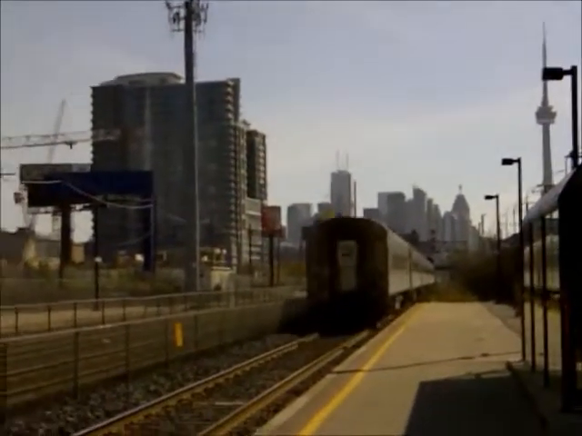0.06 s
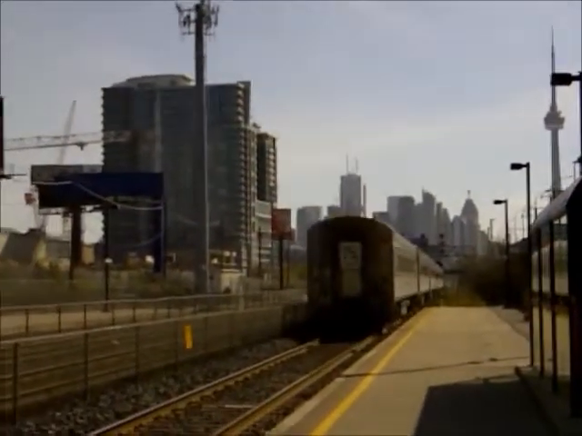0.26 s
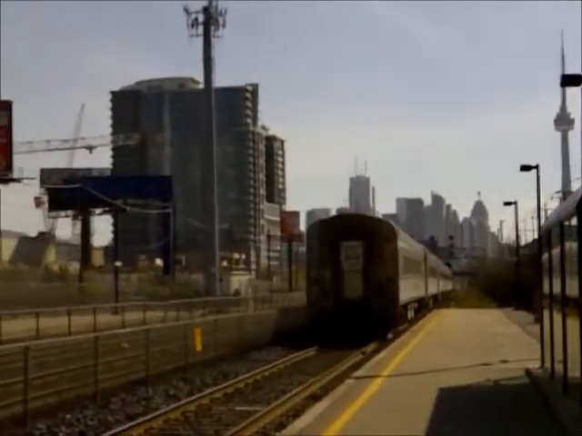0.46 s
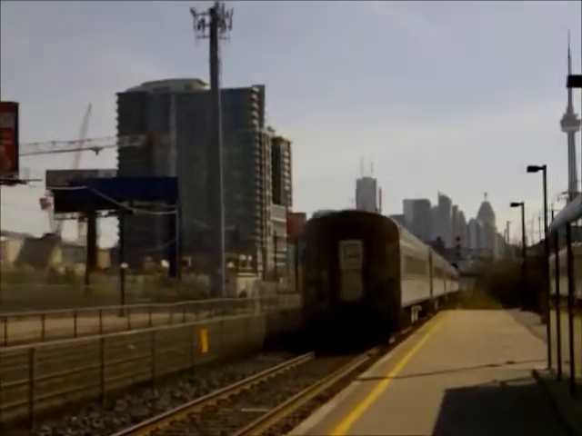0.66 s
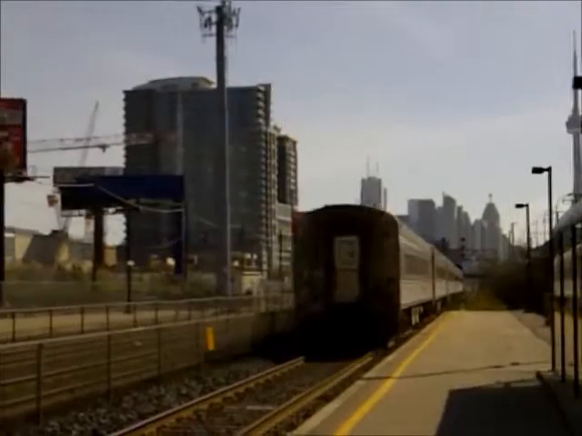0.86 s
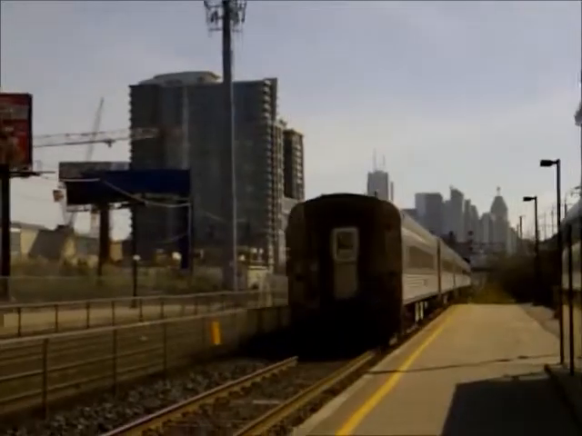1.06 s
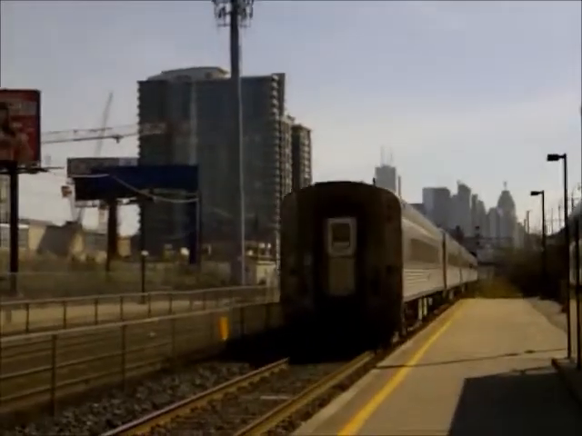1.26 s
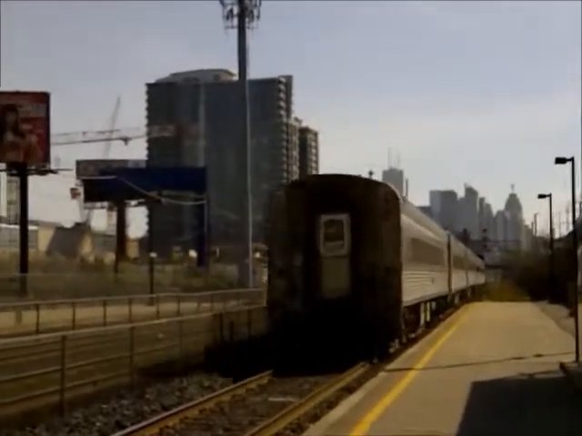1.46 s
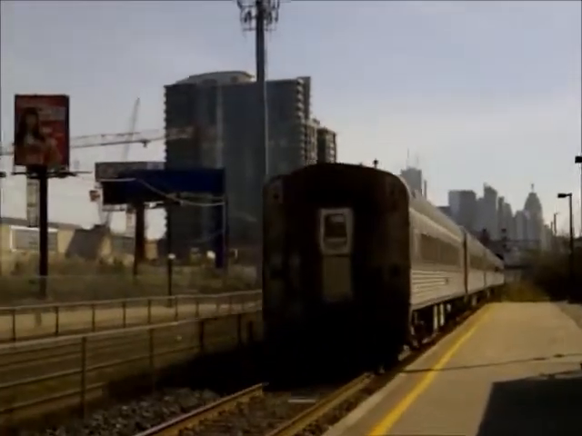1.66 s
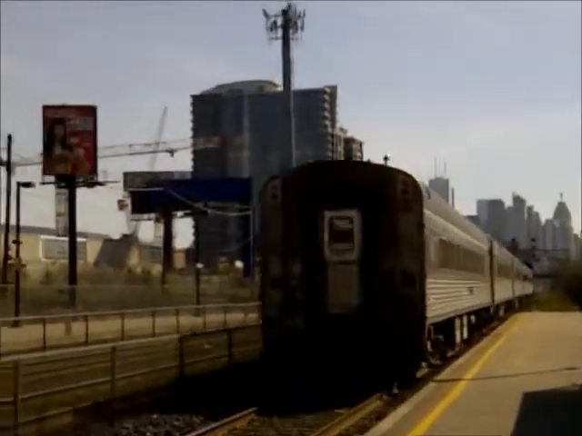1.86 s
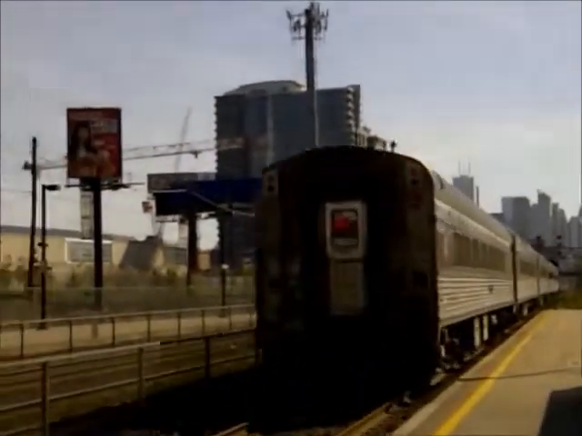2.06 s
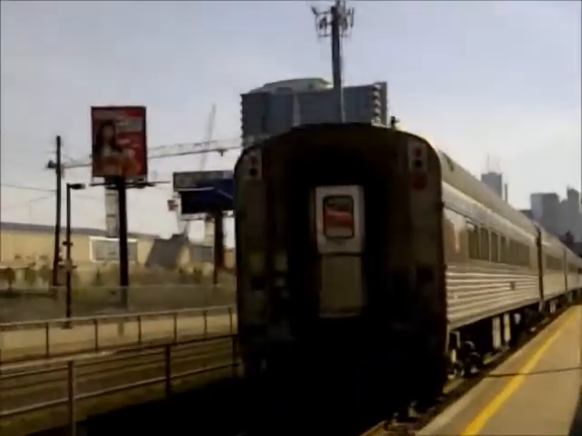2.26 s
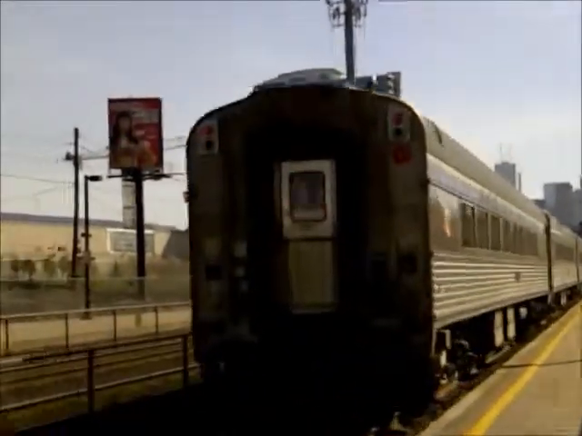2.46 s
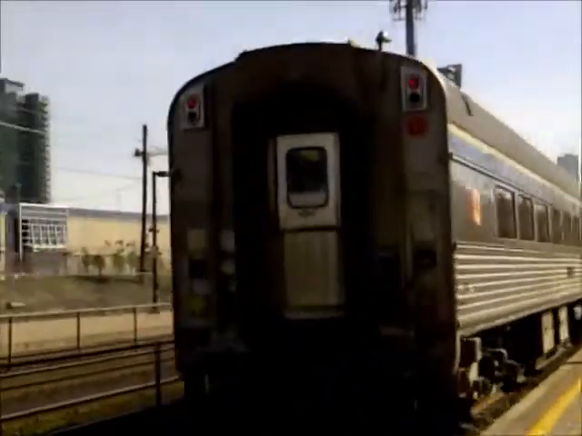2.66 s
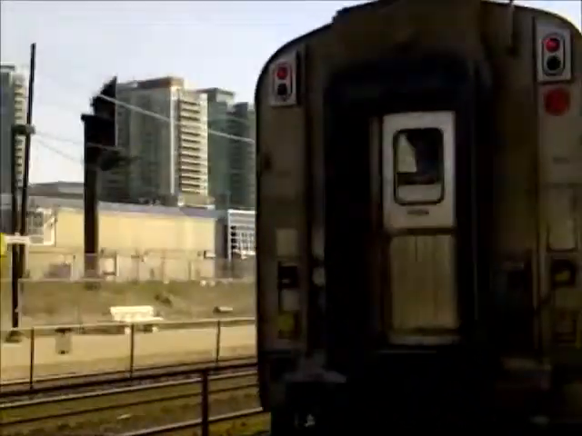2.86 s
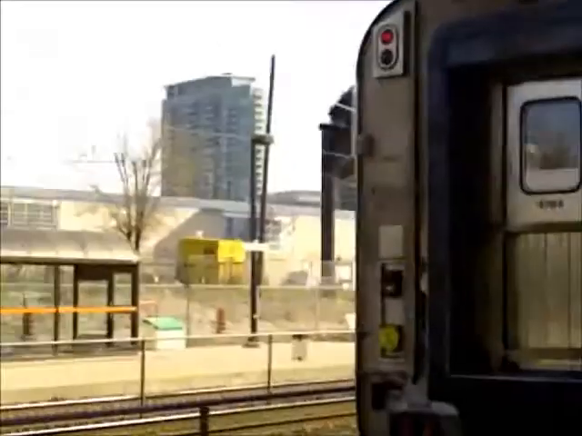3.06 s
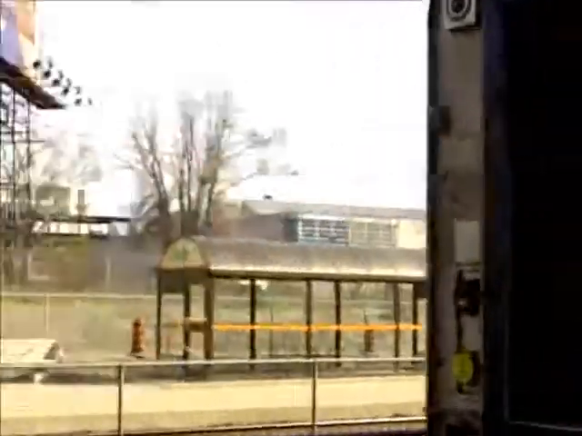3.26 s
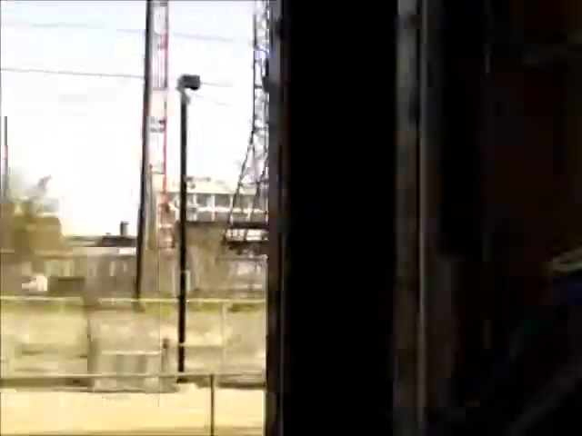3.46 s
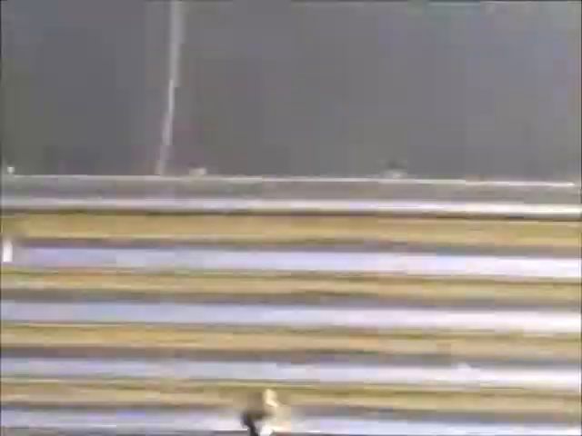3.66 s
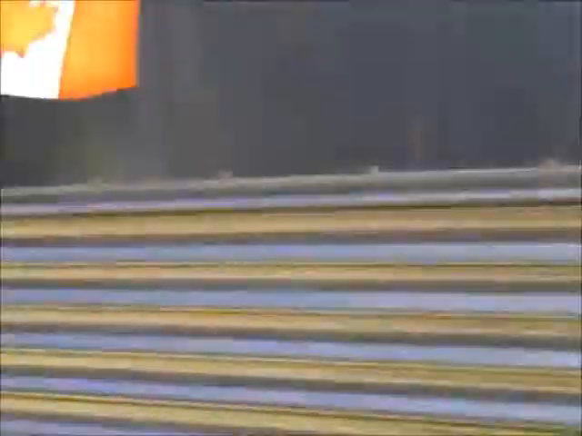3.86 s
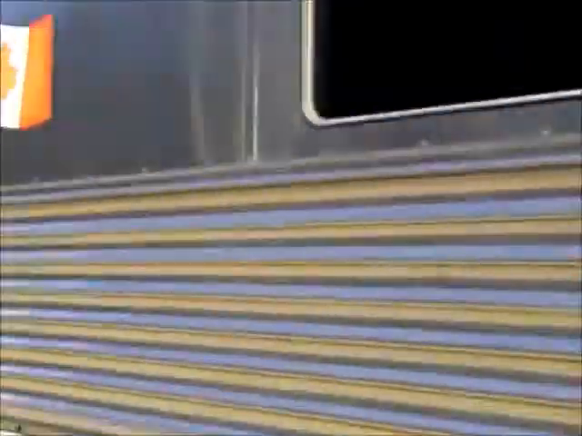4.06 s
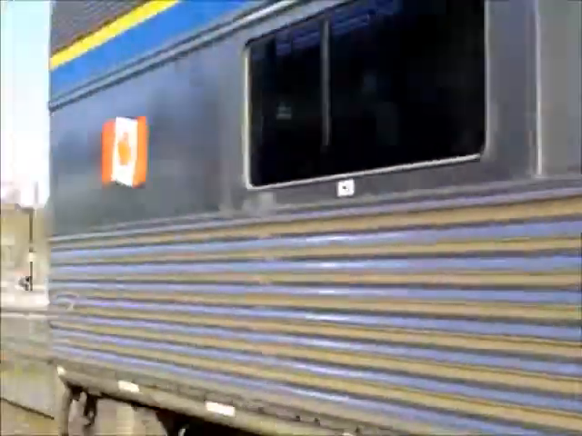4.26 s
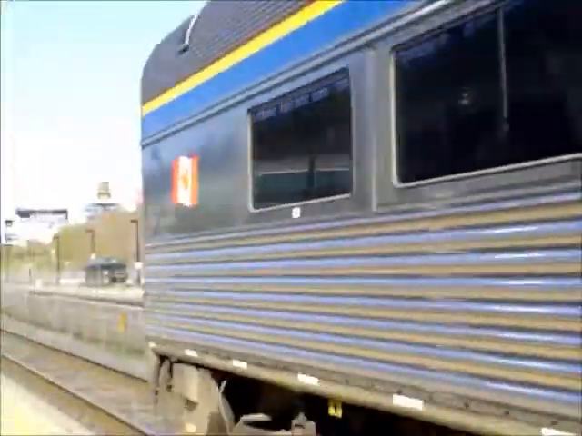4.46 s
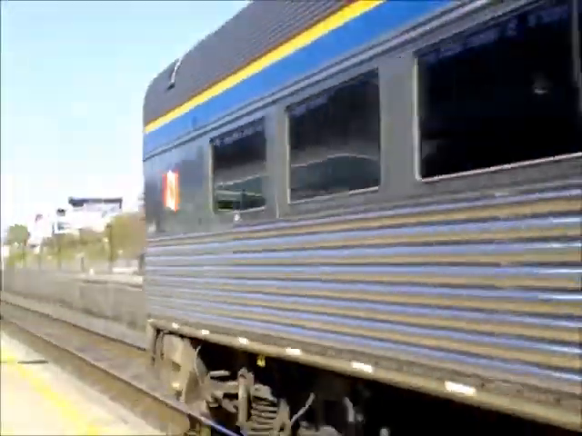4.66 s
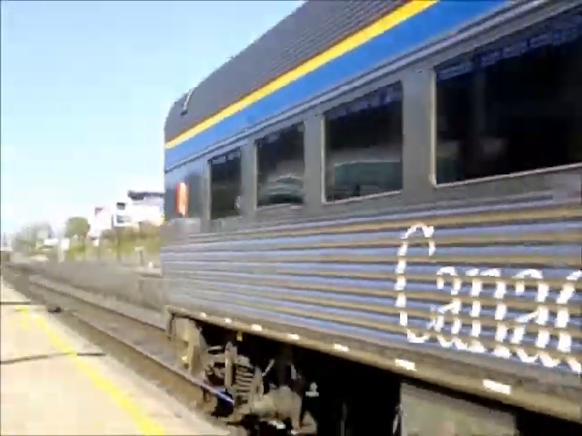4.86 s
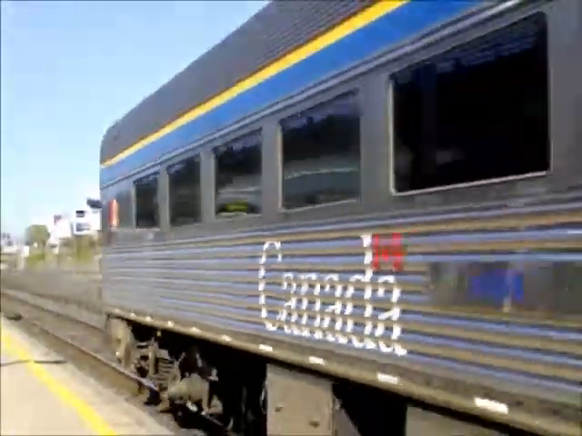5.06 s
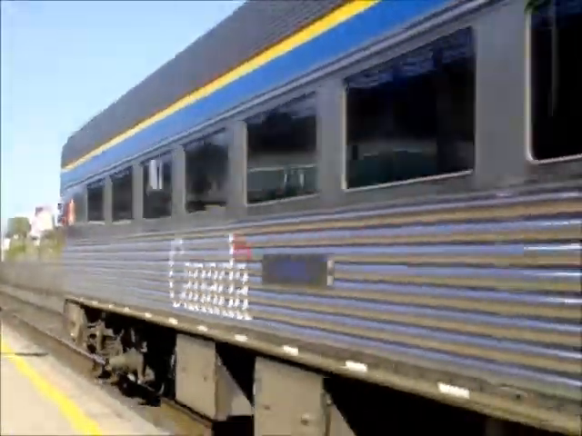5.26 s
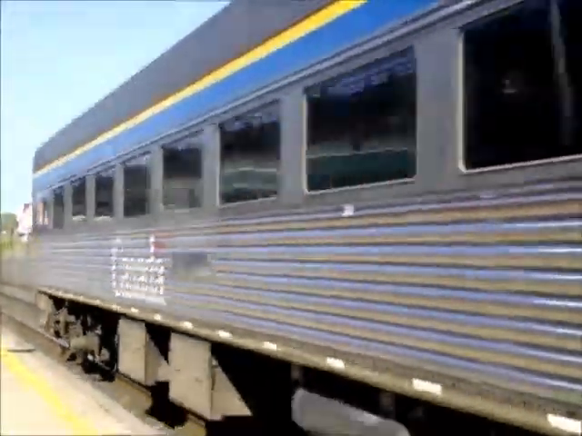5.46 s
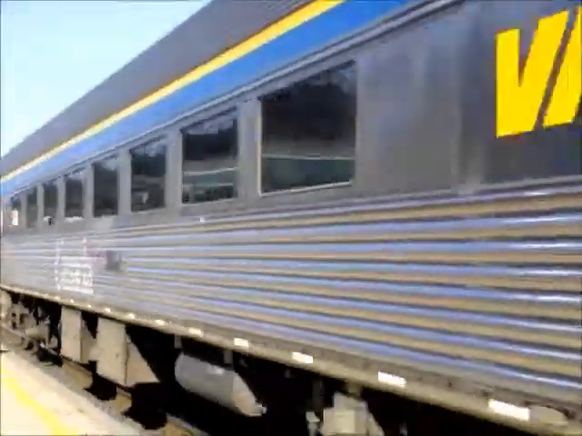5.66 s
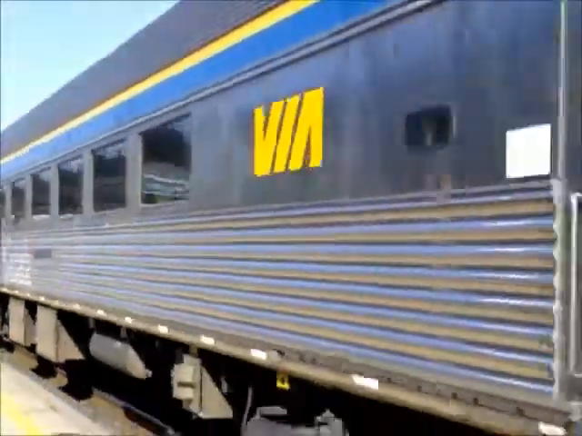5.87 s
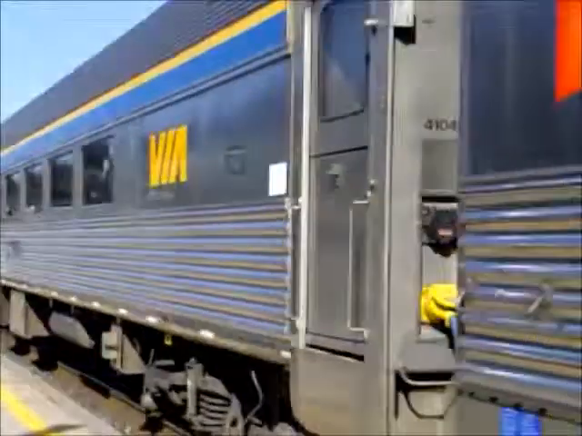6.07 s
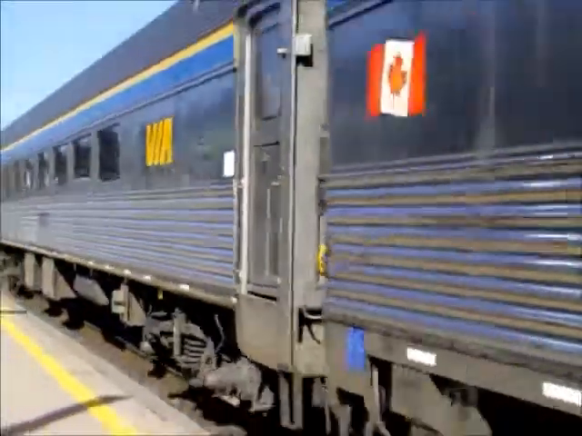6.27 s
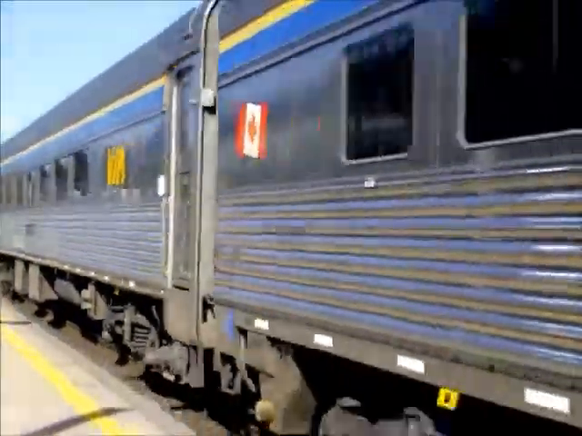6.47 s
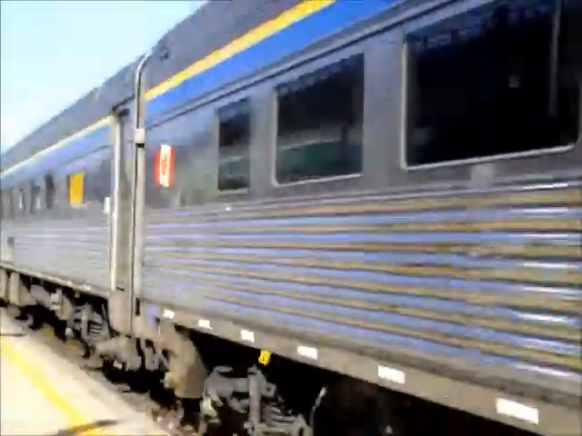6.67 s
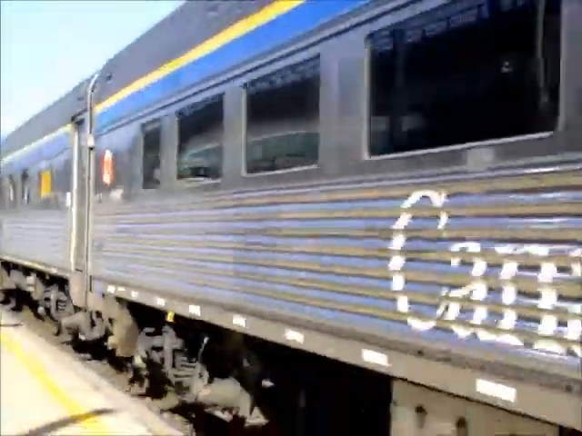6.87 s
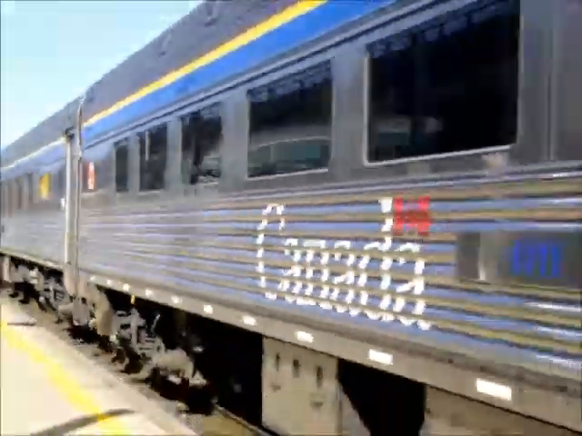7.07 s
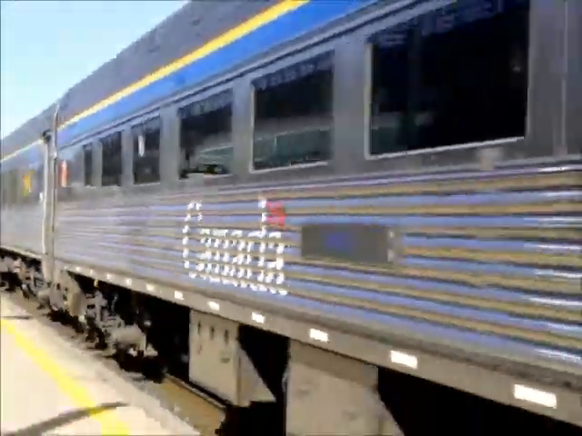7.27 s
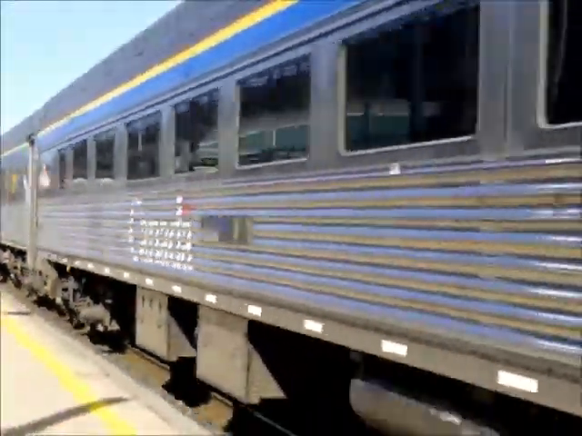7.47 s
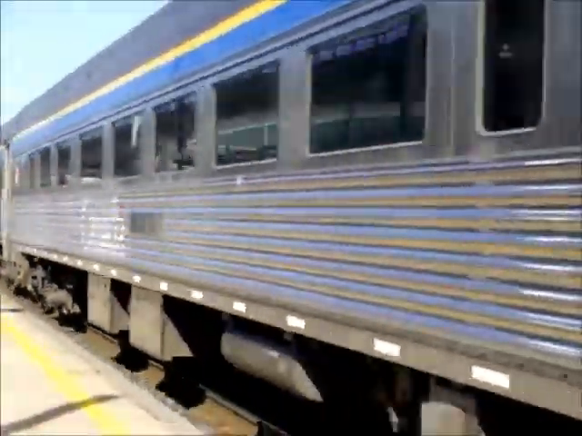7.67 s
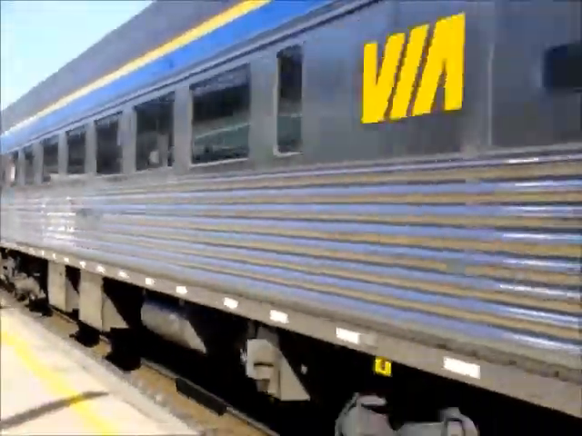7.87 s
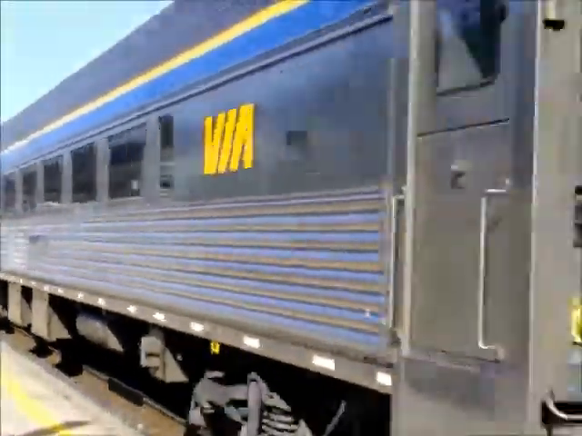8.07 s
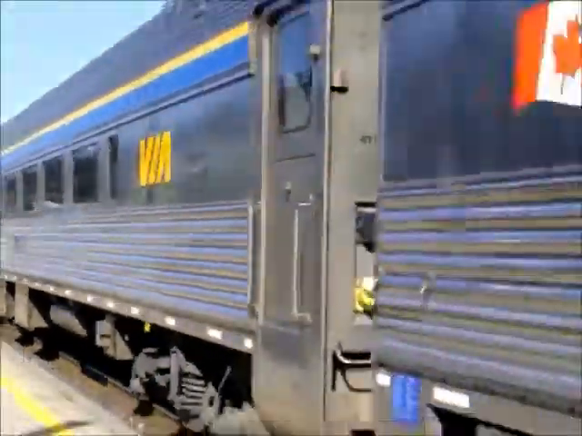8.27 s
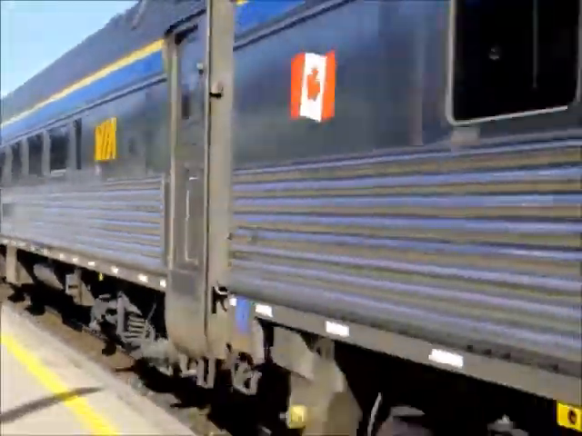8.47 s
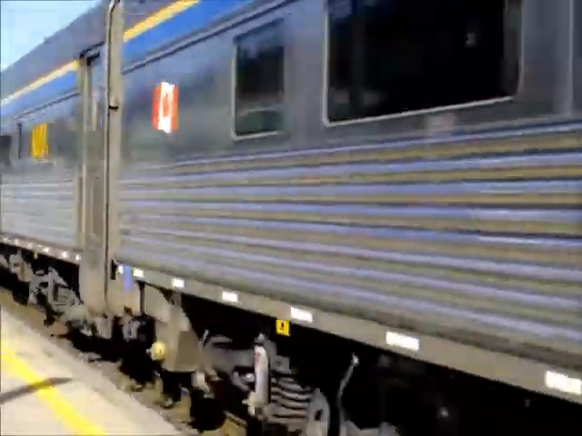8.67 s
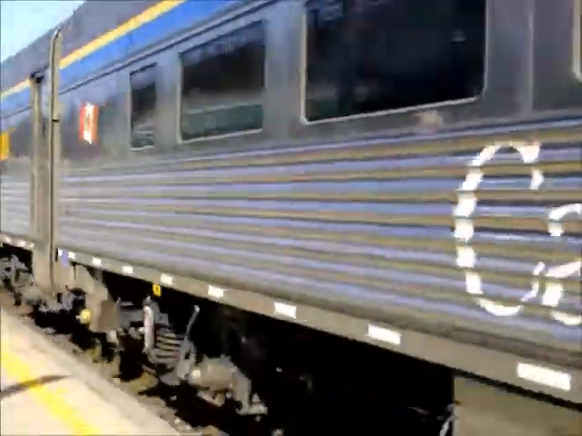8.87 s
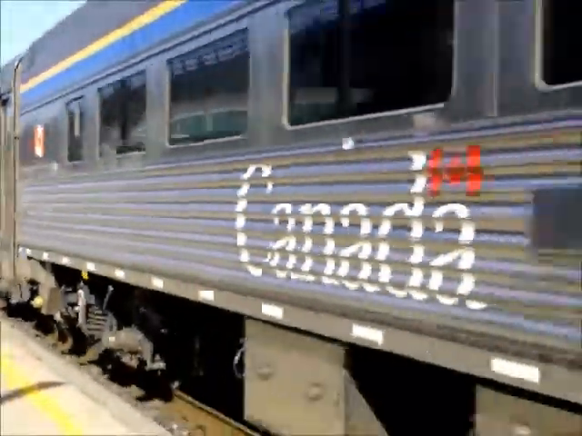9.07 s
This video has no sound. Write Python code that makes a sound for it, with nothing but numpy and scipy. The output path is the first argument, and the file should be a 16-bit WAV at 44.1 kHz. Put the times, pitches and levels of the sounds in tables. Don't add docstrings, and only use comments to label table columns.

```python
import sys
import numpy as np
from scipy import signal
from scipy.io import wavfile
from scipy.ndimage import uniform_filter1d, minimum_filter1d

SR = 44100
rng = np.random.default_rng(int(sys.argv[2]) if len(sys.argv) > 2 else 0)


def store_pcm(level_fs):
    pcm = np.round(np.clip(level_fs, -1, 1) * 32767).astype(np.int16)
    wavfile.write(sys.argv[1], SR, np.atleast_2d(pcm).T)


def elevation(decibels):
    levels = np.asarray(decibels, float)
    return 10 ** (levels / 20)


N = 402633
STEP = 64


def unit(x):
    return x / np.sqrt(np.mean(x ** 2))


def band(x, lo_hz, hi_hz):
    sos = signal.butter(2, [lo_hz, min(hi_hz, SR / 2.2)], "bandpass", fs=SR, output="sos")
    return signal.sosfilt(sos, x)


def walk(rate):
    hold, count = int(SR / STEP / rate), N // STEP + 1
    levels = np.repeat(rng.standard_normal(count // hold + 1), hold)
    return unit(uniform_filter1d(uniform_filter1d(levels, hold), hold)[:count])


def fine(control):
    return np.interp(np.arange(N) / STEP, np.arange(len(control)), control)


def add(out, s, x):
    i = int(s * SR)
    out[i:i + len(x)] += x[:len(out) - i]


def swell(t, rise_s):
    return np.sin(np.pi / 2 * np.minimum(t / rise_s, 1)) ** 2


def stay(t, start, end, edge_s):
    return np.clip(np.minimum(t - start, end - t) / edge_s + 0.5, 0, 1)


def layers(t):
    # t/s, level/dB (0 = a coach abreast)
    nearness = [(0, -16), (0.8, -15), (1.3, -9.5), (1.75, -10.5), (2.45, -10), (2.76, -3.5), (3.15, -3.5),
                (3.4, -1), (3.85, 1.5), (4.2, 0.7), (5.0, -0.5), (6.0, -0.1), (6.55, 1.2), (7.2, -0.76),
                (8.2, 0.4), (9.13, -1.1)]
    # start t/s, length t/s, level/dB
    grinds = [(1.06, 0.19, 4.5), (1.3, 0.39, 5.5), (2.68, 0.3, 4), (3.496, 0.66, 2), (4.298, .15, 1.5),
              (4.845, 1.15, 3), (6.379, .1, 3.5), (6.678, 0.096, 1.5), (6.9, .1, 2.5), (7.1, .2, 2.5),
              (7.52, 0.28, 2), (8.998, .4, 4.5)]
    town_sinks = [1.2, 1.3]
    near_db = np.interp(t, *np.transpose(nearness))
    grind_db = sum(db * stay(t, s, s + length, 0.11) for s, length, db in grinds)
    town = elevation(-31 + np.interp(t, town_sinks, [0, -5]))
    engine_nears_db = 0.7 * (t - 4.0)
    ground = elevation(-33 + 1.7 * np.minimum(near_db, 0) + engine_nears_db)
    drum_db = -13 + near_db
    rumble_db = 20 * np.log10(np.hypot(town, ground))
    roar_db = -24 + 0.53 * near_db + 0.41 * grind_db
    hiss_db = -41.5 + 0.49 * near_db + grind_db
    return drum_db, rumble_db, roar_db, hiss_db


def rolling(t):
    # f/Hz, level/dB per Hz
    far_colour = [(15, -42), (25, -7), (97, -16.5), (193, -5), (228, -6), (276, -0.5), (351, -6),
                  (456, -0.5), (513, -13), (733, -16), (952, -14.5), (1500, -21), (1900, -35),
                  (5280, -57.5), (7370, -65), (9580, -93), (16200, -120)]
    near_colour = [(15, -53), (25, -18.5), (86, -14), (120, -15.5), (240, 1), (456, -2), (806, -14.5),
                   (1650, -19), (2040, -35.5), (2350, -33.5), (4500, -44.5), (5400, -55.5), (6300, -60),
                   (7370, -58), (9580, -95), (16200, -120)]
    arrives = [2.5, 4.23]
    # t/s, level/dB
    boom = [(0, 1), (0.7, 3), (1.5, 1), (2.2, 0), (2.7, -4), (3.2, 3), (3.7, -1), (4.2, -2), (4.8, 0),
            (5.5, 0), (6.1, 0), (6.6, 1), (7.1, -3), (7.6, 0), (8.2, 3), (8.8, -4), (9.13, -3)]
    boom_range = [110, 150, 210, 260]
    drum, rumble, roar, hiss = layers(t)
    near = np.interp(t, arrives, [0, 1])
    boom_db = np.interp(t, *np.transpose(boom))
    far_hz, far_level = np.transpose(far_colour)
    near_hz, near_level = np.transpose(near_colour)
    shake, out = walk(15), 0
    for lo, hi, db, shared_db, own_db in ((33.6, 146.0, rumble, 0.18, 0.53), (149.8, 600, drum, 0.82, 1.16),
                                          (600, 1900, roar, 1.1, 0.9), (1900, 7600, hiss, 1.3, 1.1)):
        edges = np.geomspace(lo, hi, int(4 * np.log2(hi / lo)) + 1)
        gains = []
        for a, b in zip(edges, edges[1:]):
            middle = np.log(a * b) / 2
            far_db = np.interp(middle, np.log(far_hz), far_level)
            near_db = np.interp(middle, np.log(near_hz), near_level)
            gains.append(elevation(far_db + near * (near_db - far_db)) * np.sqrt(b - a))
        gains = np.array(gains)
        gains *= elevation(db) / np.sqrt(np.sum(gains ** 2, axis=0))
        for a, b, gain in zip(edges, edges[1:], gains):
            octaves = np.interp(np.log2(a / 330), [-1, 0, 0.44, 1.7], [-0.4, 0, 1, 0.26])
            dull_db = -0.5 * np.maximum(t - 5.2, 0) * octaves
            floor_db = boom_db * np.interp(a, boom_range, [0, 1, 1, 0])
            shake_db = shared_db * shake + own_db * walk(13) + 0.6 * walk(3)
            flicker = elevation(shake_db + dull_db + floor_db)
            out = out + fine(gain * flicker) * unit(band(rng.standard_normal(N), a, b))
    return out


def singing(t):
    # start t/s, end t/s, f/Hz, width f/Hz, level/dB
    resonances = [(0.41, 13, 93, 12, -40), (0.62, 0.9, 280, 6, -34), (1.5, 1.95, 279, 9, -32),
                  (0.21, 2, 460, 26, -39.5), (3.49, 4.79, 1690, 90, -32), (7.6, 7.8, 1830, 70, -41.5),
                  (4.8, 6.6, 1850, 63, -46.5), (8.0, 9.3, 1650, 46, -40.5), (6.9, 11, 1200, 91, -37),
                  (3.3, 4.7, 2400, 200, -43), (4.6, 7.9, 2400, 70, -43), (7.9, 9.2, 2250, 120, -46),
                  (3.5, 4.9, 3950, 180, -54), (4.2, 5.7, 4000, 160, -50), (5.6, 9.3, 3900, 140, -52),
                  (3.4, 8.4, 3100, 120, -54.5), (2.75, 3.55, 387, 60, -21), (4.3, 9.3, 4880, 200, -61),
                  (4.6, 7.9, 2270, 120, -47)]
    hum_turn = 2 * np.pi * 92.9 * np.cumsum(1 + 0.012 * fine(walk(4))) / SR
    out = fine(elevation(-43 + 3.0 * walk(3))) * np.sqrt(2) * np.sin(hum_turn)
    white = rng.standard_normal((2, N))
    for k, (start, end, hz, width, db) in enumerate(resonances):
        on = slice(max(int((start - 0.5) * SR), 0), int((end + 0.5) * SR))
        noise = np.roll(white, k * SR // 2, axis=1)[:, on]
        rough = signal.lfilter([1], [1, -np.exp(-np.pi * width / SR)], noise)
        turn = 2 * np.pi * hz * np.cumsum(1 + 0.011 * fine(walk(3))[on]) / SR
        ring = unit(rough[0] * np.cos(turn) + rough[1] * np.sin(turn))
        patchy = elevation(db + 2.8 * walk(11) + 1.4 * walk(2.5))
        level = fine(stay(t, start, end, 0.2) * patchy)[on]
        out[on] += level * band(ring, hz / 1.29, hz * 1.295)
    return out


def ticks():
    # t/s, peak level/dB
    clicks = [
        (0.1256, -43),
        (0.2853, -41),
        (0.4479, -36),
        (0.4658, -41),
        (0.6823, -48),
        (0.8031, -49),
        (0.9941, -36),
        (1.8794, -44),
        (2.0243, -43.5),
        (2.5004, -39),
    ]
    out, t = np.zeros(N), np.arange(SR // 5) / SR
    for s, db in clicks:
        rough = 1 + 0.4 * rng.standard_normal(len(t))
        click = rough * np.cos(2 * np.pi * 5600 * t) * np.exp(-t / 0.0004)
        add(out, s, elevation(db + 6.0) * band(click, 3000, 7200))
    return out


def clanks():
    # t/s, peak level/dB, hiss above 2 kHz level/dB, main ring f/Hz, length factor
    blows = [(0.569, -10, -56, 318, 0.64), (0.612, -10.5, -59, 418, 0.76), (1.037, 1, -34, 1055, 0.87),
             (1.079, -3, -34.5, 426, 1.2), (1.117, -4, -35.5, 350, 0.82), (1.247, 1, -29, 857, 1.25),
             (1.283, -11, -33, 950, .8), (1.318, -2.5, -29, 327, .9), (1.378, -15, -33, 410, 0.74),
             (1.455, -14, -33.5, 1400, 1.25), (1.522, -7.5, -31, 350, 0.43), (1.579, -11, -35.5, 320, 1.37),
             (2.493, -7.5, -41.5, 376, 1.1), (2.612, -2, -37, 330, 0.99), (2.702, -7.5, -35, 378, 1.13),
             (3.069, -5, -42, 304, 1.07), (3.124, -7, -48, 328, 1.2), (3.223, -9.5, -42, 323, 1.16)]
    # f/Hz, level/dB, fall by 60 dB t/s
    switch_rings = [(286, -6, 0.11), (369, -4, 0.099), (482, -3, 0.12), (664, -4, 0.042), (764, 2.5, 0.046),
                    (924, -4.5, .04), (1120, -8, 0.034), (1350, -9, 0.02), (1750, -13, 0.017),
                    (2050, -15, 0.025), (2600, -18, .02), (3100, -22, .02)]
    rise_s, fall_s = 0.0098, 0.0145
    out, t = np.zeros(N), np.arange(SR // 3) / SR
    rails = sum(elevation(g) * np.sin(2 * np.pi * hz * t) * 1000. ** (-t / t60) for hz, g, t60 in switch_rings)
    for s, db, hiss_db, hz, length in blows:
        shape = swell(t, rise_s * length) * np.exp(-t / fall_s / length)
        blow = rng.standard_normal(len(t)) * shape
        crunch = unit(band(signal.fftconvolve(blow, rails)[:len(t)], 220, 3400))
        ring = unit(band(blow, hz - min(0.22 * hz, 140.), hz + min(0.21 * hz, 140.)))
        body = min(hz / 750, 1.) * crunch + elevation(-0.5) * ring
        grit = rng.standard_normal(len(t))
        hiss = unit(signal.lfilter([1], [1, -0.8], band(grit, 2000, 5200)))
        sizzle = unit(band(grit, 0.83 * 6340, 1.12 * 6340))
        splash = (hiss + elevation(-14) * sizzle) * uniform_filter1d(shape ** 0.5, size=500)
        clank = elevation(db - 5.0) * body / np.abs(body).max() + elevation(hiss_db - 2.5) * splash
        add(out, s - 0.55 * rise_s * length, clank)
    t = np.arange(SR // 2) / SR
    yard = rng.standard_normal(len(t)) * np.minimum(t / 0.011, 1) * 1000. ** (-t / 0.75)
    echo = signal.fftconvolve(out, yard / np.sqrt(np.sum(yard ** 2)))[:N]
    return out + elevation(-6.5) * echo


def ring_parts(parts):
    out, t = np.zeros(N), np.arange(SR // 5) / SR
    rise_s, unsteady = 0.006, 0.45
    for s, hz, db, t60 in parts:
        flutter = unit(uniform_filter1d(rng.standard_normal((2, len(t))), size=180))
        tone = (1 + unsteady * flutter[0]) * np.sin(2 * np.pi * hz * t + unsteady * flutter[1])
        tone = band(band(tone, hz / 1.6, hz * 1.6), hz / 1.6, hz * 1.6)
        add(out, s - rise_s / 2, elevation(db) * swell(t, rise_s) * 1000. ** (-t / t60) * tone)
    return out


def pings():
    # t/s, f/Hz, peak level/dB, fall by 60 dB t/s
    struck = [(1.040, 1117, -7, .07), (1.060, 2050, -22, .06), (1.076, 2050, -24, 0.055),
              (1.115, 2000, -23, 0.065), (1.117, 3300, -34, .06), (1.248, 765, -9, .12),
              (1.254, 2105, -20, .13), (1.279, 946, -16, .12), (1.288, 2890, -31, .09),
              (1.316, 2900, -25.5, .07), (1.316, 1250, -19.5, 0.065), (1.372, 1254, -21, .08),
              (1.455, 2110, -22.5, 0.17), (1.456, 937, -18, .1), (6.279, 3140, -30.5, .06),
              (6.396, 2155, -21, 0.064), (6.940, 3200, -28, .12), (7.571, 3620, -32, 0.057),
              (7.853, 1450, -19, .07), (7.855, 2170, -24, .06), (7.860, 2920, -27, 0.089),
              (8.305, 1296, -17.5, .09), (8.530, 1087, -15.5, .12), (8.533, 2980, -33, .07),
              (0.569, 324, -16, .03), (0.612, 380, -11, .05), (0.630, 270, -15, .12),
              (1.042, 293, -14, 0.073), (1.055, 482, -12.5, .12), (1.084, 440, -12, .09),
              (1.112, 291, -13, .08), (1.130, 300, -14, .1), (1.152, 470, -14, .1), (1.240, 474, -14, .15),
              (1.252, 1000, -13, .06), (1.252, 1510, -18, .06), (1.270, 400, -13, .1),
              (1.326, 310, -9.5, .1), (2.695, 4510, -43, .12), (2.695, 6520, -55, .12),
              (2.86, 2450, -30, 0.11), (7.65, 2350, -32, .19), (7.104, 600, -11, .05),
              (8.074, 600, -11, .05), (6.938, 2600, -29, .07), (7.568, 3100, -31, .06),
              (8.528, 1800, -24, .07),
              (1.240, 6200, -40, .2),
        (1.255, 6700, -43, .15),
        (1.450, 6300, -41, .2),
        (1.044, 1700, -20, .08),
        (1.048, 2250, -25, .06),
        (1.250, 1750, -20, .08),
        (1.316, 5500, -42, .06),
        (6.945, 3600, -33, .1),
        (7.78, 3300, -35, .07),
        (2.74, 3100, -36, .2),
    ]
    return ring_parts(struck)


def knocks():
    # t/s, peak level/dB, crack against ring level/dB, ring f/Hz
    joints = [(2.5012, -14, -8, 1140), (2.705, -27, -6, 2120), (2.825, -20.5, 5, 3100),
              (2.8994, -23, -5, 4340), (3.2167, -14, -9, 1240), (3.66, -23, 1, 3100),
              (3.8897, -19, 6, 2500), (3.9885, -23.5, 2, 2880), (4.327, -16.5, -1, 1500),
              (4.573, -22, -2, 1750), (4.6783, -20, 6, 2600), (4.8596, -22, 7, 2500),
              (5.0994, -20.5, 8.5, 2400), (5.268, -19.5, 8, 2680), (5.3054, -13, -11, 795),
              (5.3795, -15.5, 3, 2500), (5.69, -22, 7, 3250), (6.1534, -19, 3, 800), (6.390, -21, 3, 2190),
              (6.939, -20, 10.5, 2400), (7.1033, -19, 2, 904), (7.1382, -21.5, 9, 2700),
              (7.417, -22, 12, 2700), (7.5688, -21, 5, 2400), (7.632, -21, 8, 2300),
              (7.7074, -17.5, 0, 804), (7.8524, -19, 9, 1900), (8.075, -20, -5, 800), (8.304, -14, 0, 1250),
              (8.5262, -14.5, 3.5, 1000), (8.8981, -23, -4, 2500)]
    out, t = np.zeros(N), np.arange(SR // 5) / SR
    for s, db, crack_db, hz in joints:
        shape = swell(t, 0.0054) * 1000. ** (-t / 0.12)
        crack = band(band(rng.standard_normal(len(t)), 540, 3300), 300, 3600)
        crack = unit(signal.lfilter([1], [1, -0.9], crack))
        ring = unit(band(band(rng.standard_normal(len(t)), hz * 0.88, hz * 1.13), hz * 0.7, hz * 1.4))
        knock = elevation(crack_db) * crack + ring * min(2200 / hz, 3.)
        add(out, s - 0.004, elevation(db - 11.0) * shape * knock)
    return out


def flicked_grit():
    # t/s, peak level/dB
    scratches = [(4.2479, -34.5), (4.559, -37), (4.9, -34), (4.9375, -29.5), (4.9937, -34), (5.3868, -32),
                 (5.481, -31.5), (5.6015, -33), (5.724, -32.5), (5.9735, -33), (6.2174, -37), (6.3307, -37),
                 (6.3925, -35), (6.5497, -36.5), (6.918, -33), (7.4092, -34), (7.5694, -28), (7.703, -36),
                 (8.897, -34.5), (8.9782, -32.5), (2.826, -33), (2.838, -35), (3.04, -36), (6.941, -30),
                 (7.625, -32), (8.308, -32), (8.32, -34), (8.528, -28), (8.538, -31)]
    out, t = np.zeros(N), np.arange(SR // 5) / SR
    for s, db in scratches:
        noise = unit(band(band(rng.standard_normal(len(t)), 3000, 5300), 2600, 5600))
        add(out, s, elevation(db - 9.0) * noise * np.minimum(t / 0.002, 1) * np.exp(-t / 0.005))
    return out


def thumps():
    # t/s, peak level/dB, f/Hz
    flats = [(3.259, -10, 458), (3.505, -8, 479), (3.729, -9, 476), (4.06, -5, 470), (4.139, -10, 560),
             (4.203, -5, 468), (4.283, -7, 452), (4.447, -11, 484), (4.913, -9, 479), (5.1, -4, 452),
             (5.174, -8, 466), (5.305, -7, 538), (5.56, -7, 477), (5.775, -8, 455), (5.876, -8, 466),
             (6.153, -7, 501), (6.366, -12, 471), (6.946, -9, 522), (7.209, -7, 452), (7.329, -9, 466),
             (7.42, -7, 573), (7.707, -9, 493), (7.821, -12, 490), (8.319, -7.5, 522), (9.008, -10, 487),
             (9.108, -10, 517)]
    return ring_parts([(s, hz, db - 2.5, 0.06) for s, db, hz in flats])


def scene():
    t = np.arange(N // STEP + 1) * STEP / SR
    train = rolling(t) + singing(t)
    blows = ticks() + clanks() + pings() + knocks() + flicked_grit() + thumps()
    return (train + blows)[None]


def faint_treble_dropped(x):
    hz, s, z = signal.stft(x, SR, nperseg=1024)
    hungry = np.cos(2 * np.pi * (s - 0.105) / (2 / 15)) > 0.45
    bar_db = np.where(hungry, -81, -90.5) - np.interp(s, [3.2, 3.6], [0, 12.0])
    luck = rng.standard_normal((len(hz) // 4 + 1, len(s) // 2 + 1))
    luck = luck.repeat(4, axis=0).repeat(2, axis=1)[:len(hz), :len(s)]
    cell = uniform_filter1d(uniform_filter1d(np.abs(z) ** 2, size=3, axis=-1), size=4, axis=-2)
    loud_enough = cell > elevation(bar_db + 5.5 * luck) ** 2
    z = z * (loud_enough | (hz < 4000)[:, None])
    return signal.istft(z, SR, nperseg=1024)[1][..., :N]


def top_cut(x):
    return signal.sosfilt(signal.butter(12, 7520, fs=SR, output="sos"), x)


def record(dry):
    # t/s, level/dB
    ducks = [(2.844, -2), (3.683, -4), (3.824, -3), (3.923, -2), (4.211, 0), (4.296, -3), (4.421, -3.5),
             (5.113, -1.5), (5.333, -0.5), (5.88, -3), (6.286, -2.5), (6.457, -1.5), (6.613, -5.5),
             (6.971, 0), (7.637, -3), (7.866, -3), (8.091, -4), (8.323, 0.5), (8.54, -2)]
    t, gain_db = np.arange(N // STEP + 1) * STEP / SR, 0
    for s, db in ducks:
        since = np.maximum(t - s, 0)
        gain_db = gain_db + 1.7 * db * np.minimum(since / 0.0033, 1) * np.exp(-since / 0.039)
    x = dry * fine(elevation(gain_db + 0.09))
    x = signal.sosfilt(signal.butter(2, 36, "highpass", fs=SR, output="sos"), x)
    ceiling = 0.75
    room = minimum_filter1d(np.minimum(ceiling / (np.abs(x) + 1e-9), 1), size=400)
    x = x * uniform_filter1d(uniform_filter1d(room, size=200), size=200)
    x = signal.sosfilt(signal.cheby2(10, 60, 8400, fs=SR, output="sos"), x)
    return top_cut(faint_treble_dropped(x))


dry = scene()
out = record(dry)
store_pcm(out)
```